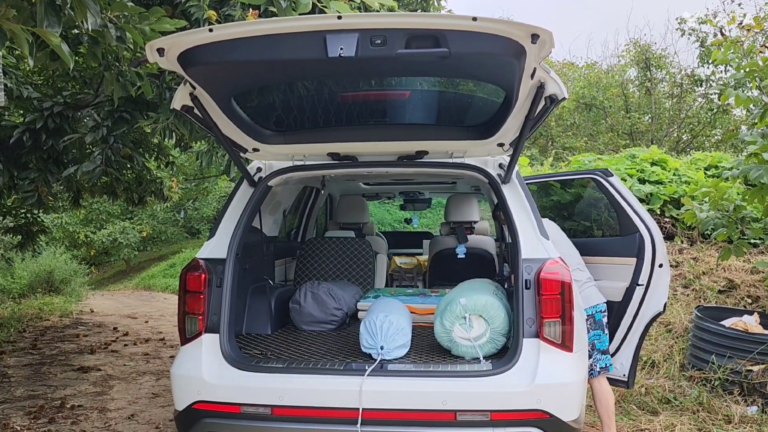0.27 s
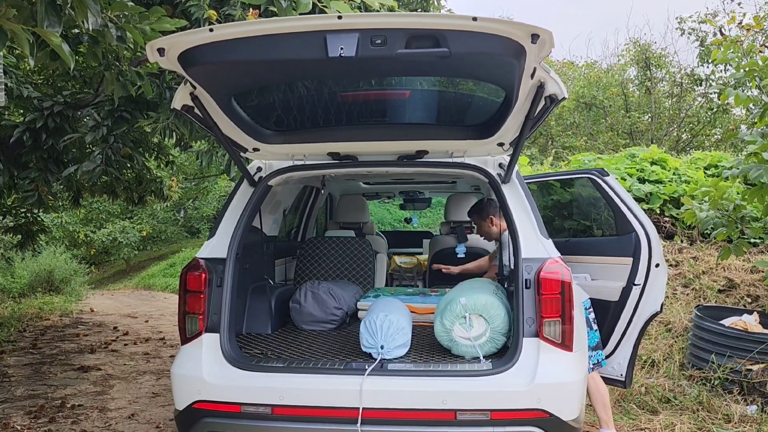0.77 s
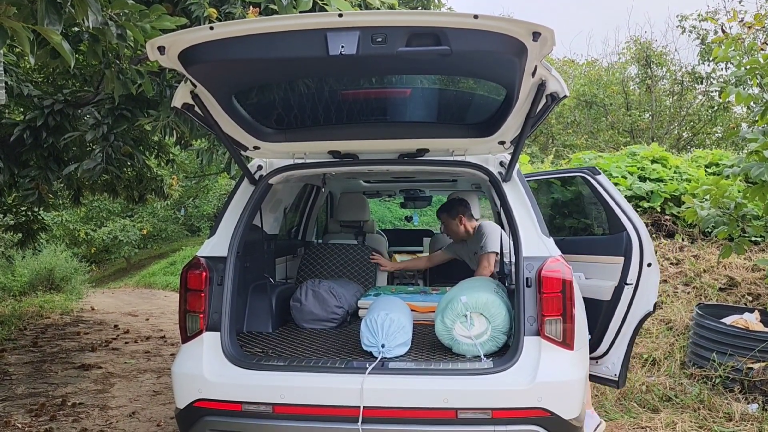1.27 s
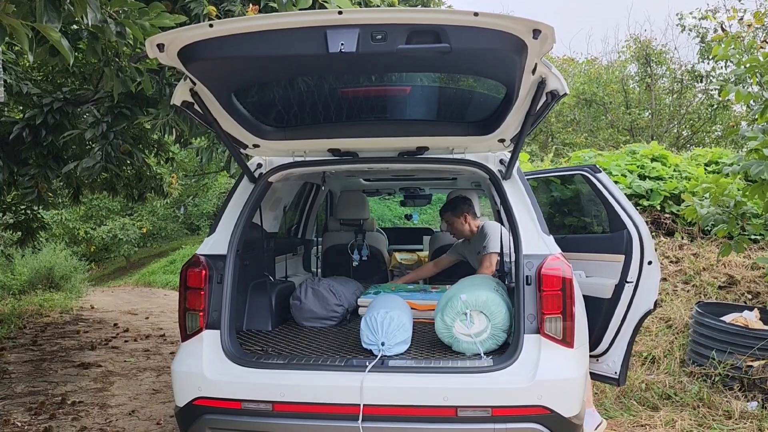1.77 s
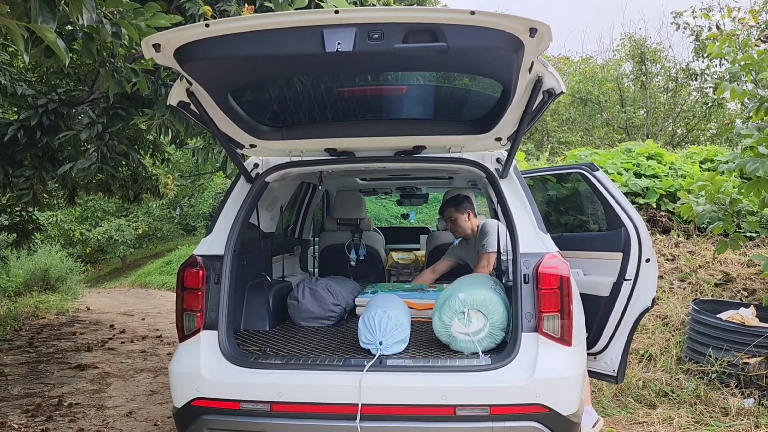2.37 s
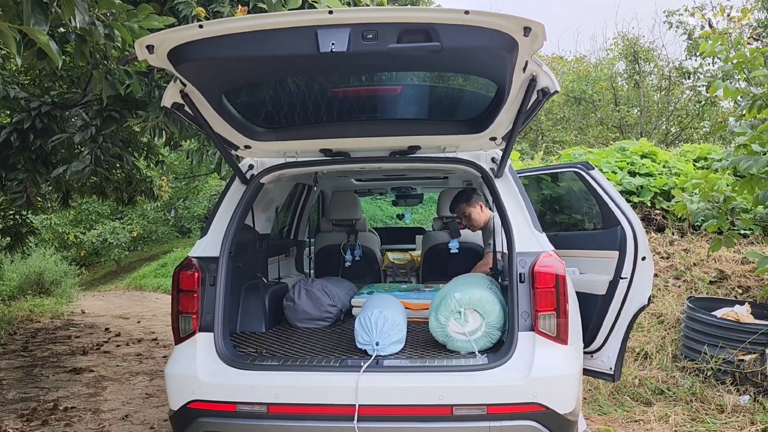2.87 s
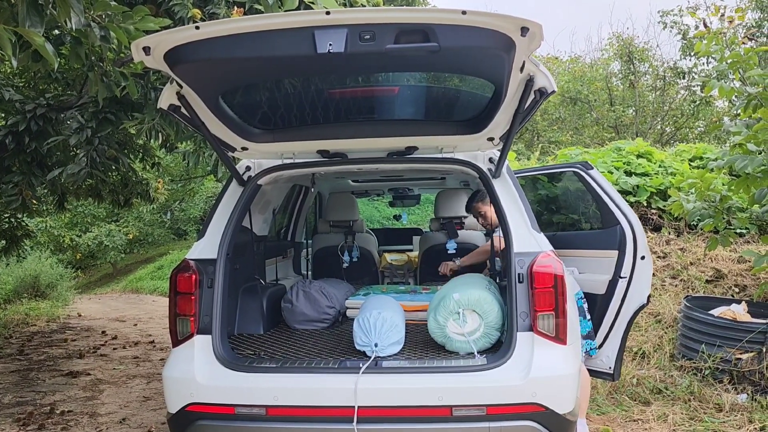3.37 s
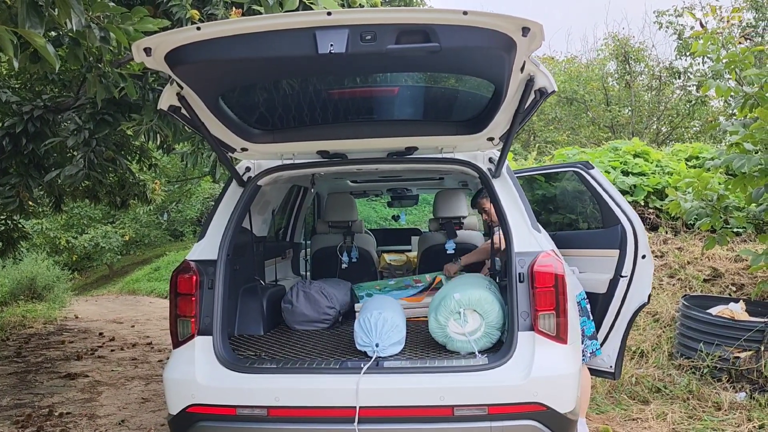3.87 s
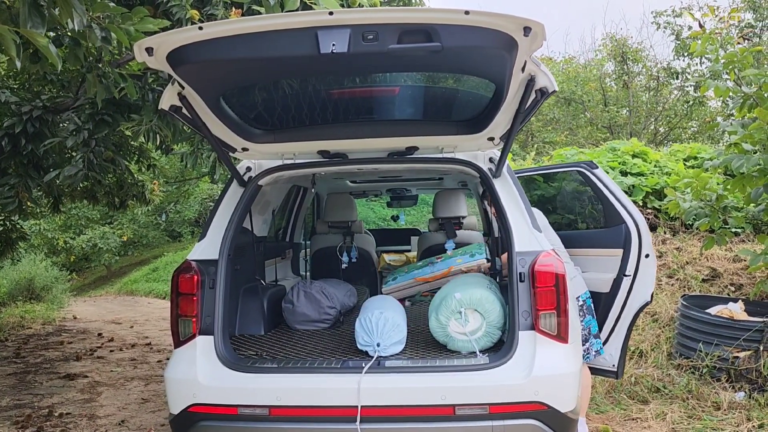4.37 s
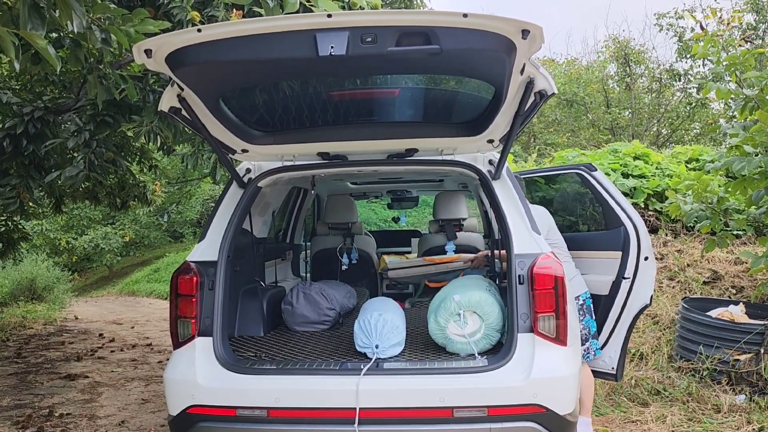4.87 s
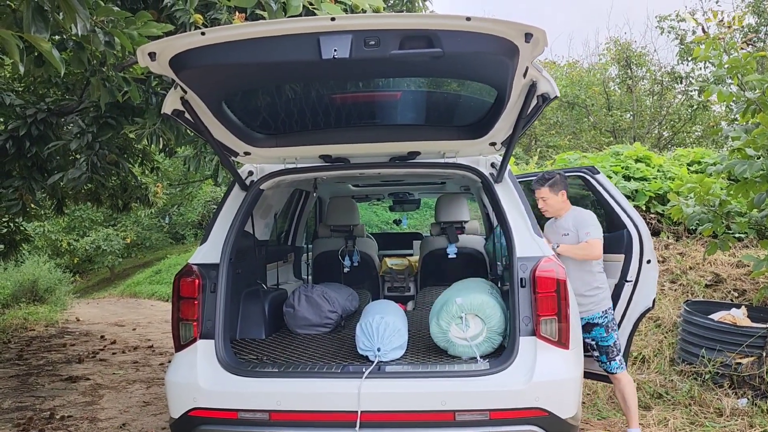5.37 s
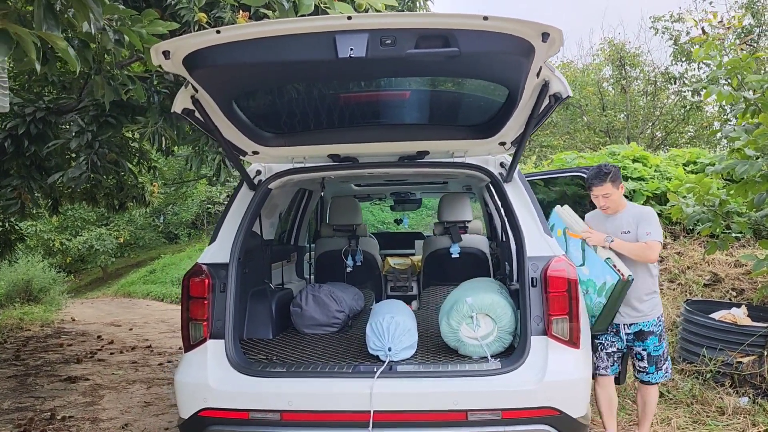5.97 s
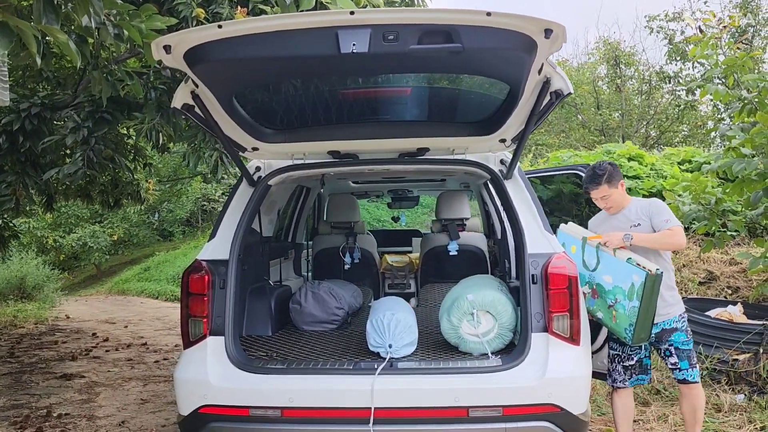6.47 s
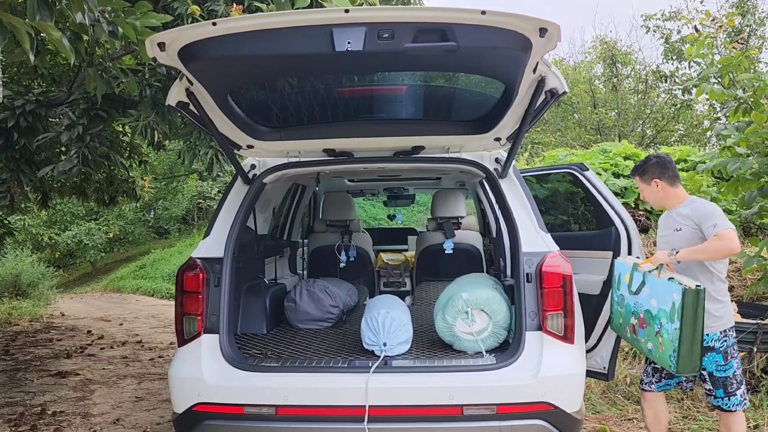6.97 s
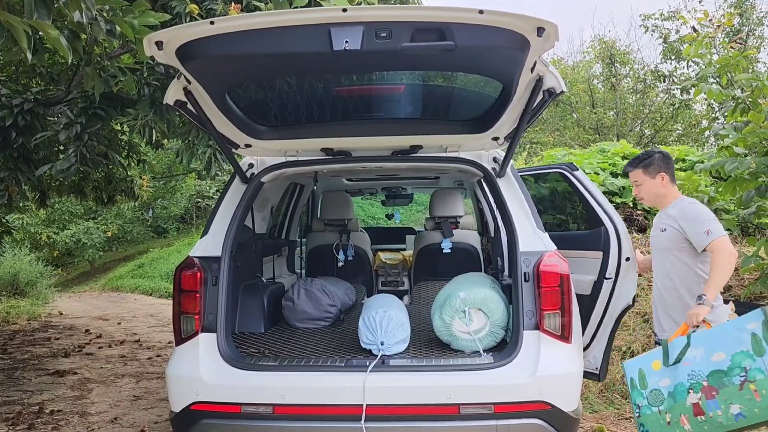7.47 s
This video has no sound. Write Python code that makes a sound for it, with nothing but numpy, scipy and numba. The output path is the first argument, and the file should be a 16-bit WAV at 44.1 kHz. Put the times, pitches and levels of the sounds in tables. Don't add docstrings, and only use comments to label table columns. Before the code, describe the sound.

A few metres behind an open car, a low bump and light clunks come first, then a seat back crashes flat with a deep body boom and a short rattle. Quieter latch clicks and fabric rubs follow. From about four seconds a stiff plastic mat slides, crinkles and tocks irregularly while being pulled out and carried. High throbbing cicadas, faint crickets and distant traffic stay underneath.

```python
import sys
import numpy as np
from scipy import signal
from scipy.fft import rfft, irfft
from scipy.io import wavfile
from scipy.ndimage import uniform_filter1d
from numba import njit

SR = 44100
rng = np.random.default_rng(int(sys.argv[2]) if len(sys.argv) > 2 else 0)


def linear_from_db(decibels):
    return 10 ** (np.asarray(decibels, float) / 20)


def unload_audio(sound):
    columns = np.transpose(np.atleast_2d(sound))
    steps = np.round(np.clip(columns, -1, 1) * 32767)
    wavfile.write(sys.argv[1], SR, steps.astype(np.int16))


N = 339570
TIME = np.arange(N) / SR

# [t/s, level/dB]
CICADA_LEVEL = [
    (0.0, -59.5),
    (1.7, -56.5),
    (2.1, -61),
    (2.64, -57.5),
    (6.2, -57),
    (7.7, -55.5),
]
THROB_HZ, SINGER_S = 35.9, 0.396
GRIP_DB_S, SLACK_DB_S = 748, 378.5


def curves(table):
    s, *columns = np.transpose(table)
    return [np.interp(TIME, s, c) for c in columns]


def at(table, hz):
    f, value = np.transpose(table)
    return np.interp(np.log(hz + 1), np.log(f + 1), value)


def unit(x):
    return x / np.sqrt(np.mean(x ** 2))


def peak_one(x):
    return x / np.max(np.abs(x))


def colour(x, table):
    return irfft(rfft(x) * linear_from_db(at(table, np.fft.rfftfreq(len(x), 1 / SR))), len(x))


def band(x, hz, width_hz, order=2):
    edges = np.clip([hz - width_hz / 2, hz + width_hz / 2], 10, .45 * SR)
    return signal.sosfilt(signal.butter(order, edges, "band", fs=SR, output="sos"), x)


def walk(rate):
    k = int(SR / rate)
    held = np.repeat(rng.standard_normal(N // k + 1), k)
    return 1.3 * uniform_filter1d(uniform_filter1d(held, k), k)[:N]


def grit(share, spread_db):
    size_db = spread_db * np.minimum(rng.exponential(size=N), 4.5)
    return unit(rng.standard_normal(N) * (rng.random(N) < share) * linear_from_db(size_db))


def fade(t, t60):
    return linear_from_db(-60 * t / t60)


def ring(t, modes):
    return peak_one(sum(linear_from_db(db) * np.sin(2 * np.pi * hz * t) * fade(t, t60) for hz, db, t60 in modes))


def gate(start, end, edge_s):
    return np.clip(np.minimum(TIME - start, end - TIME) / edge_s + .5, 0, 1)


def stroke_db(s, held):
    return -GRIP_DB_S * np.clip(s - TIME, 0, 1) - SLACK_DB_S * np.clip(TIME - s - held, 0, 1)


def add(out, s, x):
    i = int(s * SR)
    out[i:i + len(x)] += x[:N - i]


def seat():
    # [t/s, frame level/dB, boom level/dB, rattle level/dB, freedom to ring/0-1]
    blows = [(0.0, -20, -24, -39, 0.16), (0.021, -36.5, -26, -49.5, 1), (0.049, -38, -21.5, -72, 0.5),
             (0.578, -57, -49, -47, 0.9), (.59, -50, -40.5, -47, 0.65), (0.595, -34.5, -21.5, -40.5, 0.09),
             (.64, -43.5, -41, -62, 0.3), (1.466, -41.5, -32.5, -49.5, 0.3), (1.81, -38.5, -37, -54, 0.9),
             (1.826, -21.5, -16, -28.5, 0.7), (1.8341, 3, 1, -18.5, 0.32), (1.845, -7, -14.5, -24.5, 0.12),
             (1.854, -16.5, -7.5, -28, 0.48), (1.896, -21.5, -28, -28.5, 0.09), (1.9, -37, -38, -41.5, 1)]
    # [f/Hz, level/dB, t60/s]
    body_modes = [(44, -14.5, 0.37), (64, -13.5, 0.54), (69.4, -3.5, 0.69), (98.7, -18.5, 0.76),
                  (111, 0.5, 0.28), (130, -4, .14), (140.3, -3, 0.25), (160.6, -14, 0.053)]
    # [f/Hz, level/dB, t60/s]
    frame_modes = [(218, -3.5, 0.28), (294, -17.5, .14), (340, 2, 0.16), (474, 5.5, 0.088),
                   (600, -5.5, 0.24), (700, -13, 0.13), (900, -3.5, 0.096), (1020, -2.5, 0.13),
                   (1370, -18.5, 0.16), (1590, -8, 0.1), (2140, -17, 0.081), (2247, -21, 0.11)]
    # [f/Hz, level/dB per Hz]
    rattle_colour = [(88, -29), (150, 4), (396, -8.5), (561, -8.5), (751, -20.5), (948, -16), (1910, -26.5),
                     (2500, -23.5), (2950, -38.5), (3900, -41), (5440, -32.5), (15500, -55)]
    # [f/Hz, t60/s]
    rattle_t60 = [(150, 0.24), (270, 0.17), (500, 0.26), (1500, 0.33), (4000, 0.31), (12000, 0.17)]
    boom_lead_s = .003
    out, t = np.zeros(N), TIME[:SR]
    for s, frame_db, boom_db, rattle_db, free in blows:
        contact_ms = 2.33 * linear_from_db(boom_db - frame_db)
        push = np.hanning(int(contact_ms * SR / 1000) + 3)
        boom = band(np.convolve(ring(t, body_modes), push / push.sum())[:SR], 310, 500)
        shares = 1.6 * rng.standard_normal(len(frame_modes))
        struck = [(hz, db + d, t60 * free) for (hz, db, t60), d in zip(frame_modes, shares)]
        tap = push[::4] / push[::4].sum()
        frame = np.convolve(ring(t, struck), tap)[:SR]
        noise = colour(rng.standard_normal(SR), rattle_colour)
        trim = 0
        for hz in 180 * 1.5 ** np.arange(12):
            trim = trim + band(noise, hz, 0.3 * hz) * fade(t, free * at(rattle_t60, hz))
        trim = trim / np.std(trim[:SR // 100]) * (1 - np.exp(-t / .0012))
        add(out, max(s - boom_lead_s, 0), -linear_from_db(boom_db) * boom)
        add(out, s, linear_from_db(frame_db) * frame + linear_from_db(rattle_db) * trim)
    return out


def strokes():
    # [full strength from t/s, held/s, rub level/dB, hollow level/dB, crinkle level/dB]
    wipes = [(0.0, 0.076, -65.5, 17.5, -10), (.13, 0.035, -64.5, 4, -16), (1.391, 0.027, -68.5, -19, -3),
             (1.85, 0.05, -48.5, -14.5, -9), (2.56, 0.028, -48.5, -4.5, -12), (.92, 0.54, -72.5, -4, -11),
             (1.6, 0.28, -69.5, 1.5, -7), (1.815, 0.022, -51.5, 5, -11), (2.524, 0.033, -59, -6.5, -12),
             (2.66, 0.0295, -75, -4, -12), (3.09, 0.042, -64, -14, -12), (3.179, 0.048, -77, -4.5, -16),
             (3.471, 0.032, -51.5, -7, -19), (3.52, 0.033, -54.5, -0.5, -18), (3.56, 0.05, -61, -1.5, -15),
             (3.92, 0.08, -58, -3, -17), (4.01, 0.072, -56.5, -2.5, -14), (4.12, 0.042, -59, 1, -16),
             (4.18, 0.092, -53, -3, -17.5), (4.272, 0.047, -52.5, 1, -9.5),
             (4.35, 0.098, -50.5, -10, -13.5), (4.44, 0.029, -51, 5.5, -18)]
    # [full strength from t/s, held/s, rub level/dB, hollow level/dB, crinkle level/dB]
    tugs = [(4.28, 0.18, -50, -20, -32), (4.52, 0.067, -55.5, -4, -17), (4.618, 0.021, -54, 2.5, -20),
            (4.801, 0.028, -63.5, 5, -19), (4.66, 0.1, -64.5, -5, -21), (4.87, 0.13, -71, 4.5, -20),
            (5.03, 0.041, -61, -3, -15.5), (5.23, 0.024, -59.5, 1.5, -14), (5.34, 0.023, -62, 3, -20),
            (4.996, 0.017, -52.5, 4, -18), (5.138, 0.034, -59, 0.5, -18), (5.28, 0.08, -69.5, -2, -7.5),
            (5.49, 0.037, -57.5, -2.5, -21), (5.765, 0.046, -69.5, -9, -4), (5.446, .12, -55.5, -14, -16),
            (5.61, 0.021, -53.5, -1.5, -20), (5.685, 0.021, -56.5, 2, -19.5), (5.74, 0.018, -56.5, -1, -17),
            (5.82, 0.057, -60.5, -6, -17), (5.9, 0.19, -66.5, 5, -13.5), (6.1, 0.14, -64.5, 2, -15.5),
            (6.225, 0.018, -58, -2.5, -18), (6.29, 0.17, -65.5, -1, -19), (6.5, .03, -60.5, 3, -15),
            (6.436, 0.027, -51.5, -11, -12.5), (6.558, 0.025, -53.5, 5, -18), (6.6, .035, -54, 0.5, -18),
            (6.648, 0.0061, -46, -4.5, -17), (6.68, 0.044, -59, 0, -13.5), (6.757, 0.075, -60, 1, -16.5),
            (6.9, .12, -64.5, 2.5, -18), (7.05, 0.044, -56, -1, -17.5), (7.14, 0.075, -64.5, 1, -14),
            (7.204, 0.056, -63, -3, -14), (7.28, 0.047, -63, -6.5, -11.5), (7.35, 0.11, -70.5, -7, -3.5),
            (7.599, 0.063, -61, -4, -10.5)]
    power = np.zeros((3, N))
    for s, held, rub_db, hollow_db, crinkle_db in wipes + tugs:
        layer_db = rub_db + 3.5 + np.array([[0], [hollow_db - 3.5], [crinkle_db]])
        power += linear_from_db(2 * layer_db) * linear_from_db(2 * stroke_db(s, held))
    return np.sqrt(power)


def crumple(slip, voices, tilt_db):
    out = 0
    for hz, db in voices:
        grains = unit(band(slip + .6 * grit(.006, 1.5), hz, .3 * hz, order=3))
        out = out + linear_from_db(db + tilt_db * np.log2(hz / voices[2][0]) + 1.8 * walk(45)) * grains
    return unit(out)


def mat_hum():
    # [t/s, f/Hz, level/dB]
    glide = [
        (5.72, 278, -59),
        (5.908, 302, -63),
        (6.08, 247, -83),
    ]
    hum_hz, hum_db = curves(glide)
    turn = 2 * np.pi * np.cumsum(hum_hz + 6 * walk(60)) / SR
    sounding = (TIME > glide[0][0]) & (TIME < glide[-1][0])
    return np.sqrt(2) * linear_from_db(hum_db + 4.2 * walk(40)) * sounding * (np.sin(turn) + 0.29 * np.sin(2 * turn))


def mat():
    # [f/Hz, level/dB]
    creases = [(900, 4.5), (1200, 7), (1600, 8.5), (2050, 8), (2600, 1.5)]
    # [f/Hz, level/dB]
    hollows = [(260, -7.5), (350, -4.5), (450, -1.5), (580, 1.5), (740, -8)]
    # [t/s, tilt/dB per octave]
    taut = [(0, 2.5), (2.5, 3), (2.7, 4.5), (3.1, 8.5), (3.47, 5), (3.62, 3), (3.95, 0), (4.2, -1),
            (4.36, 5.5), (4.55, -6), (4.7, 0.5), (5.0, -0.5), (5.2, -1), (5.46, 2), (5.8, -0.5), (6.45, 3),
            (6.6, -3), (7.7, 6)]
    skin_gain, hollow_gain, crinkle_gain = strokes()
    slip = unit(rng.standard_normal(N) + .6 * grit(.012, 2.0)) * linear_from_db(2.6 * walk(60))
    skin = crumple(slip, creases, curves(taut)[0])
    hollow = crumple(slip, hollows, 0)
    crinkle = linear_from_db(8.5) * unit(band(slip, 5500, 4800)) + linear_from_db(-1.5) * unit(band(slip, 13000, 5600))
    return skin_gain * skin + hollow_gain * hollow + crinkle_gain * crinkle + mat_hum()


def swish():
    # [full strength from t/s, held/s, level/dB]
    glides = [(0, .05, -64), (1.834, .03, -54), (1.895, 0.013, -53), (2.55, .05, -64), (3.52, .06, -69),
              (4.11, .04, -64), (4.272, 0.057, -56), (4.36, 0.095, -67), (5.55, .04, -68),
              (5.778, 0.027, -64), (6.44, .025, -61), (7.06, .05, -68), (7.215, 0.025, -64)]
    gain = sum(linear_from_db(db + stroke_db(s, held)) for s, held, db in glides)
    return gain * linear_from_db(1.2 * walk(60)) * unit(band(rng.standard_normal(N), 13200, 5600))


def singer(hz, throb_hz, db, uneven_db):
    throb = np.exp(2.1 * np.cos(2 * np.pi * throb_hz * (TIME - SINGER_S) + 0.19 * walk(3.2)))
    note = np.sin(2 * np.pi * np.cumsum(hz + 7 * uneven_db * walk(36)) / SR)
    return unit(throb * note) * linear_from_db(db + curves(CICADA_LEVEL)[0] + uneven_db * walk(30))


def singers():
    # [f/Hz, throb f/Hz, level/dB]
    neighbours = [
        (8790, 36.4, -11),
        (8470, 35.5, -12),
    ]
    return singer(8030, THROB_HZ, -3.5, .9) + sum(singer(*row, 3) for row in neighbours)


def cicada_chorus():
    # [f/Hz, width/Hz, level/dB]
    resonances = [(7680, 170, -1.5), (8460, 380, -2), (8720, 280, -0.5), (8480, 120, -10)]
    phase = 2 * np.pi * THROB_HZ * (TIME - SINGER_S) + 0.33 * walk(2.8)
    throb = unit(np.exp(1.893 * np.cos(phase)))
    swell = 1 + 0.063 * (throb - .7)
    out = 0
    for hz, width_hz, db in resonances:
        wings = unit(band(rng.standard_normal(N), hz, width_hz))
        out = out + linear_from_db(db + 1.1 * walk(3.8)) * wings * swell
    return unit(out) * linear_from_db(-3.0) * linear_from_db(curves(CICADA_LEVEL)[0])


def crickets():
    # [from t/s, to t/s, level/dB]
    all_bouts = [
        [(.8, 1.75, -75), (3.95, 4.5, -85), (6.3, 7.7, -71.5)],
        [(1.9, 2.5, -75.5), (4.2, 4.6, -71), (6.9, 7.7, -78.5)],
    ]
    # [f/Hz, width/Hz, trill f/Hz]
    voices = [
        (4034, 380, 30),
        (5340, 390, 38),
    ]
    # [t/s, level/dB]
    thin_notes = [(0.997, -80), (4.3, -78), (5.18, -74), (6.068, -73), (7.006, -71.5)]
    out = 0
    for (hz, width_hz, trill_hz), bouts in zip(voices, all_bouts):
        trill = 1 + 0.14 * np.sin(2 * np.pi * trill_hz * TIME)
        singing = linear_from_db(-74.5) + sum(linear_from_db(db) * gate(start, end, .2) for start, end, db in bouts)
        chirp = unit(band(rng.standard_normal(N), hz, width_hz) * trill)
        out = out + singing * linear_from_db(-4.5 + 2 * walk(7.4)) * chirp
    for start, db in thin_notes:
        hz = 4450 - 220 * (TIME - start) + 22 * walk(120)
        whistle = np.sqrt(2) * np.sin(2 * np.pi * np.cumsum(hz) / SR)
        out = out + gate(start, start + 0.34, 0.055) * linear_from_db(db + 2.4 * walk(45)) * whistle
    return out


def field():
    # [t/s, level/dB, rise/s, fall/s]
    swells = [(0.04, -35.5, 0.076, 0.081), (1.95, -37, 0.04, 0.1), (0.599, -49, 0.0072, 0.069),
              (4.3, -54, 0.13, 0.21), (5.98, -68, 0.32, 0.48), (6.821, -48.5, 0.065, 0.15),
              (7.7, -60, 0.062, 0.082), (1.121, -55.5, 0.017, 0.081), (2.53, -51.5, .015, 0.066),
              (4.63, -54, 0.018, 0.029), (5.02, -60.5, 0.035, 0.047), (6.075, -55, 0.012, 0.058)]
    # [f/Hz, level/dB per Hz]
    road_tone = [(12, -46), (20, -18), (40, -7), (66, 2), (97, -7.5), (134, -6), (197, -24), (221, -23),
                 (300, -39), (390, -56), (660, -120)]
    # [f/Hz, level/dB per Hz]
    air_tone = [(150, -14.5), (330, -13), (850, -19.5), (2000, -16), (3300, -24.5), (3900, -24),
                (4650, -23), (5400, -15), (7000, -11.5), (8300, 1), (9300, -7.5), (9900, -36), (11100, -26),
                (12200, -28.5), (15700, -27.5)]
    road_db, air_db = -60.5, -56
    swell = linear_from_db(road_db)
    for s, db, rise, fall in swells:
        swell = swell + linear_from_db(db) * np.exp(-np.abs(TIME - s) / np.where(TIME < s, rise, fall))
    flicker = linear_from_db(1.8 * walk(9))
    road = swell * linear_from_db(2.5) * flicker * unit(colour(rng.standard_normal(N), road_tone))
    return road + linear_from_db(air_db + 0.19 * walk(1.3)) * unit(colour(rng.standard_normal(N), air_tone))


def outdoors():
    return cicada_chorus() + crickets() + field()


def knocks():
    # [t/s, peak level/dB, ring f/Hz, thud level/dB]
    tocks = [(0.25, -44.5, 576, -12), (1.038, -51.5, 493, 10.5), (1.571, -47, 273, 12.5),
             (2.516, -37, 98.8, -9), (3.195, -46.5, 130.5, 7), (3.467, -36, 518, 3.5),
             (3.932, -39.5, 563, 3), (4.554, -34.5, 392, -16), (4.634, -38, 456, -13),
             (4.669, -38, 446, -20), (4.816, -43.5, 487, 4), (4.996, -38.5, 365, 0),
             (5.127, -41.5, 700, -21), (5.333, -38, 576, -27), (5.415, -34, 542, -30),
             (5.542, -33, 568, -12), (5.625, -38.5, 600, 3.5), (5.681, -43, 570, 6.5),
             (5.939, -48, 520, -20), (6.004, -41.5, 497, 0.5), (6.061, -48, 540, -8),
             (6.384, -38.5, 566, -0.5), (6.554, -38.5, 550, 4), (6.648, -31, 556, -7),
             (6.765, -42.5, 598, 6), (6.975, -42.5, 610, -8), (7.044, -28, 645, -21),
             (7.358, -42, 600, -15), (7.449, -45.5, 574, -15), (7.594, -50.5, 260, 14)]
    # [t/s, peak level/dB, ring f/Hz, t60/s, snap level/dB]
    ticks = [(1.118, -48, 1704, 0.091, 11.5), (1.219, -50.5, 1710, 0.21, -17),
             (2.289, -54.5, 1900, 0.047, 2), (2.52, -33.5, 1876, 0.068, -12), (2.656, -40, 850, 0.092, -10),
             (2.657, -41.5, 1880, 0.08, -22), (3.108, -47, 1860, 0.06, -9.5),
             (3.211, -38.5, 1056, 0.078, -21), (4.173, -33, 974, 0.057, -31.5),
             (4.28, -31.5, 1860, 0.22, 5), (4.439, -29.5, 1570, 0.21, -21),
             (4.533, -33.5, 2100, 0.078, -17), (4.737, -39, 1680, 0.029, -46),
             (5.159, -47, 1000, 0.064, -1), (5.218, -46, 2360, 0.12, -23), (6.219, -34, 1720, 0.037, -20),
             (6.431, -35, 1900, 0.07, -3), (6.461, -34.5, 1690, 0.013, 2), (6.651, -33, 1480, 0.05, -14),
             (6.799, -28.5, 2040, 0.036, -22), (6.82, -33.5, 1660, 0.034, -26),
             (7.053, -33, 2240, 0.027, -2), (7.12, -33, 1280, 0.036, -21)]
    tock_t60_s, tock_snap_db, tick_thud_db = 0.11, -23.5, -6.5
    hits = [(s, db, hz, tock_t60_s, tock_snap_db, thud_db) for s, db, hz, thud_db in tocks]
    hits += [(*row, tick_thud_db) for row in ticks]
    out, t = np.zeros(N), TIME[:SR // 4]
    for s, peak_db, hz, t60, snap_db, thud_db in hits:
        decay = fade(t, t60) * (1 - np.exp(-t / .0009))
        contact = rng.standard_normal((3, len(t))) * decay
        body = peak_one(band(contact[0], hz, .25 * hz) + .25 * band(contact[0], 1500, 2000))
        pure = peak_one(np.sin(2 * np.pi * hz * t) * decay)
        snap = peak_one(band(contact[1], 6000, 4200))
        thud = peak_one(band(contact[2], 150, 143))
        hit = body + .4 * pure + linear_from_db(snap_db - 3.0) * snap + linear_from_db(thud_db - 2.5) * thud
        add(out, s, linear_from_db(peak_db - 6.5) * hit)
    return out


def clicks():
    # [t/s, peak level/dB, ring f/Hz,
    # width/Hz, t60/s]
    release_rows = [(.255, -55.5, 1062, 250, 0.064), (.597, -33.5, 1500, 450, 0.061),
                    (.606, -34.5, 520, 403, 0.18), (1.04, -46.5, 398, 503, .05), (1.47, -45, 450, 401, 0.11),
                    (.648, -44.5, 480, 246, 0.12), (1.469, -46, 1595, 299, .05), (1.836, -13, 970, 200, .06),
                    (1.841, -15, 1621, 251.3, .08), (1.848, -12, 610.3, 247.6, 0.12),
                    (1.854, -25.5, 2384, 298.2, 0.14), (1.895, -22, 1580, 501.2, 0.07),
                    (1.896, -44.5, 2568, 900, .03), (2.523, -49, 1836, 301.3, .06),
                    (2.545, -38, 2140, 501, .05), (2.562, -46, 2287, 500, .04), (2.582, -42, 2096, 399, .04),
                    (2.6, -40, 1798, 700, .05), (3.092, -50, 2280, 350, 0.046),
                    (3.124, -46, 2500, 1400, .06), (3.472, -41, 1910, 1600, 0.058),
                    (3.486, -38, 513, 296, .05), (3.528, -40, 1987, 399, 0.056),
                    (3.564, -47, 1650, 400, 0.034), (3.604, -49, 1950, 500, .06),
                    (3.895, -48, 2255, 900, .06), (3.936, -39, 1100, 1210, 0.056),
                  (4.062, -47.5, 1100, 500, .05), (4.111, -52, 1250, 500, .04),
                  (4.219, -38.5, 1350, 600, .08), (4.302, -38, 1910, 600, .05),
                  (4.355, -39, 1830, 500, 0.13), (4.44, -30.5, 1545, 1800, 0.037),
                  (4.468, -34, 799, 700, 0.046), (4.601, -43, 1410, 400, 0.066),
                  (4.628, -44, 1502, 1200, .03), (4.737, -46, 2000, 2400, .02), (4.817, -41, 700, 900, .04),
                  (4.96, -42, 2000, 2600, 0.044), (4.997, -45, 1904, 1800, 0.03),
                  (5.069, -47, 1900, 900, 0.093), (5.147, -40.5, 1790, 600, 0.077),
                  (5.407, -46, 2400, 1500, 0.033), (5.435, -36, 1694, 1200, 0.026),
                  (5.459, -44, 1900, 800, .06), (5.492, -44.5, 580, 250, 0.1),
                  (5.545, -41, 1700, 1200, .04), (5.513, -46, 2060, 600, .05),
                  (5.742, -46, 1470, 600, 0.06), (6.079, -42, 1380, 700, 0.08),
                  (6.222, -38, 1640, 1800, 0.06), (6.43, -34.5, 1920, 700, 0.035),
                  (6.444, -27, 6500, 1600, .07), (6.448, -40, 1800, 1800, .03),
                  (6.463, -39, 1840, 1500, .02), (6.618, -35, 1300, 1000, .04),
                  (6.649, -32, 1810, 2180, 0.036), (6.8, -32, 2170, 2190, 0.029),
                  (6.888, -41, 934, 700, 0.06), (7.063, -37.5, 760, 500, 0.13),
                  (7.453, -44, 1496, 1800, 0.033), (7.645, -56.5, 1060, 600, .05)]
    out, t = np.zeros(N), TIME[:SR // 8]
    for s, peak_db, hz, width_hz, t60 in release_rows:
        chatter = .28 * rng.standard_normal(len(t)) * fade(t, t60)
        release = np.sqrt(SR / width_hz) * (t == 0) + chatter
        add(out, s, linear_from_db(peak_db) * peak_one(band(release, hz, width_hz)))
    return out


def scatter(x):
    echo = rfft(rng.standard_normal(SR // 10) * fade(TIME[:SR // 10], 0.059), N)
    return irfft(rfft(x) * echo / np.abs(echo), N)


def ports(mid, side, lean):
    half = np.array(lean) * [1, .5]
    return np.array([colour(mid + side, half), colour(mid - side, half * [1, -1])])


def scene():
    # [f/Hz, side minus mid level/dB]
    seat_wide = [(60, -28), (110, -28.5), (200, -22.5), (380, -14), (700, -22), (1290, -12.5), (2380, 2),
                 (4400, 1), (8120, 3), (15000, -8)]
    # [f/Hz, left minus right level/dB]
    seat_lean = [(60, 1), (110, 0), (200, 1), (380, 1.5), (700, 1), (1290, -1), (2380, -6.5), (4400, 3.5),
                 (8120, 0), (15000, -0.5)]
    # [f/Hz, side minus mid level/dB]
    rest_wide = [(60, -24.5), (110, -20), (200, -12.5), (380, -10), (700, -9), (1290, -4.5), (2380, -1.5),
                 (4400, 1.5), (8120, -7.5), (15000, -4)]
    # [f/Hz, left minus right level/dB]
    rest_lean = [(60, 0), (110, 0.5), (200, 0.5), (380, 4), (700, 2), (1290, 4), (2380, -2), (4400, 1.5),
                 (8120, 0), (15000, -3)]
    blows = seat()
    handling = mat() + swish() + singers() + knocks() + clicks()
    seat_side = colour(.5 * signal.hilbert(blows).imag + 0.54 * scatter(blows), seat_wide)
    rest_side = colour(scatter(handling) + outdoors(), rest_wide)
    return ports(blows, seat_side, seat_lean) + ports(handling + outdoors(), rest_side, rest_lean)


@njit
def follow(x, attack, release):
    e, out = 0., np.empty(len(x))
    for i in range(len(x)):
        e += (x[i] - e) * (attack if x[i] > e else release)
        out[i] = e
    return out


def band_limit(x):
    return signal.sosfilt(signal.butter(12, 16690, fs=SR, output="sos"), x)


def record(dry):
    envelope = follow(np.abs(dry).max(axis=0), 1 / (.06 * SR), 1 / (.35 * SR))
    gain = (1 + envelope / linear_from_db(-28.0)) ** -.2
    top_cut = signal.ellip(10, .2, 70, 15760, fs=SR, output="sos")
    mix = signal.sosfilt(top_cut, dry * gain)
    return band_limit(mix)


dry = scene()
out = record(dry)
unload_audio(out)
```